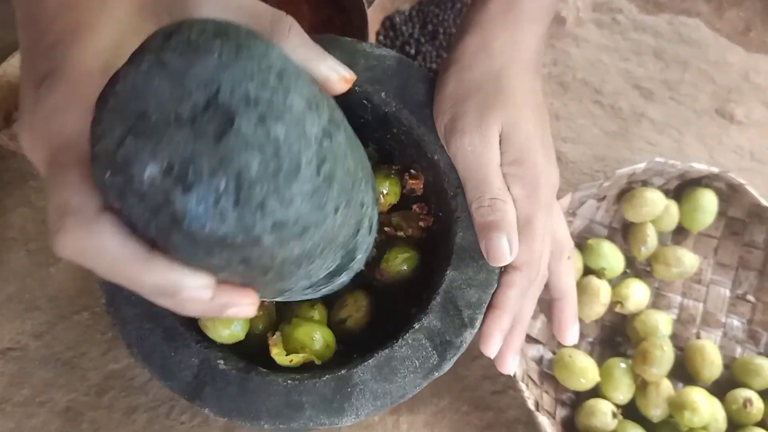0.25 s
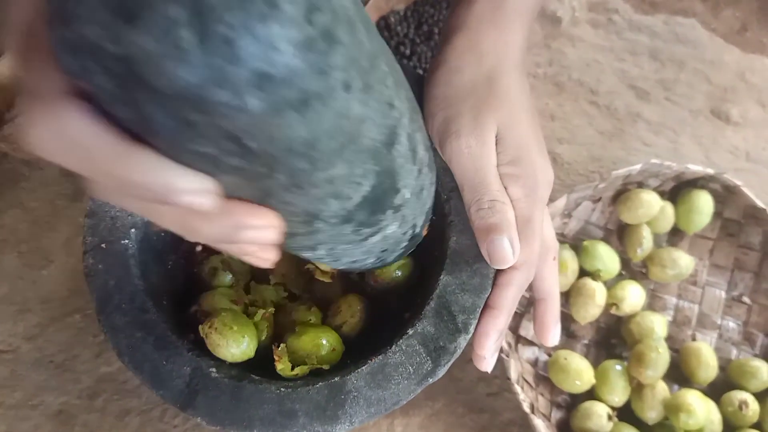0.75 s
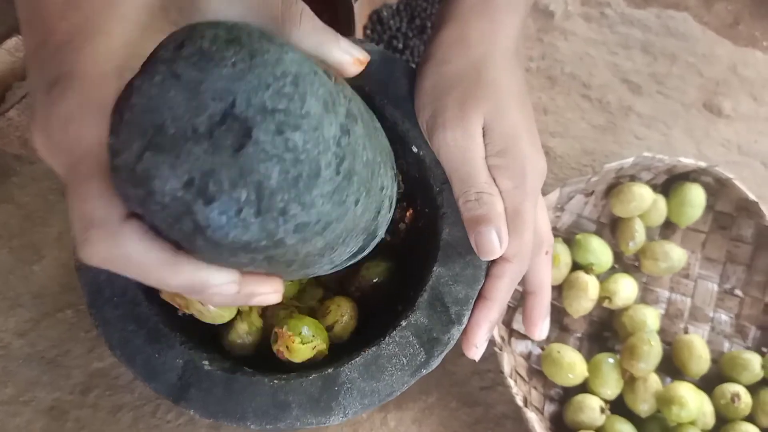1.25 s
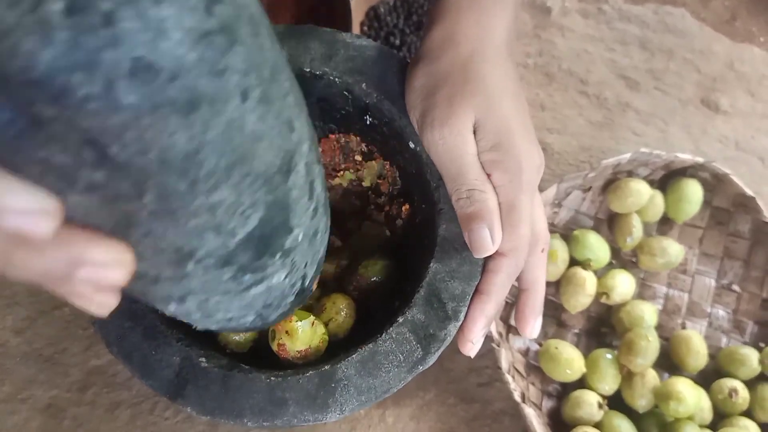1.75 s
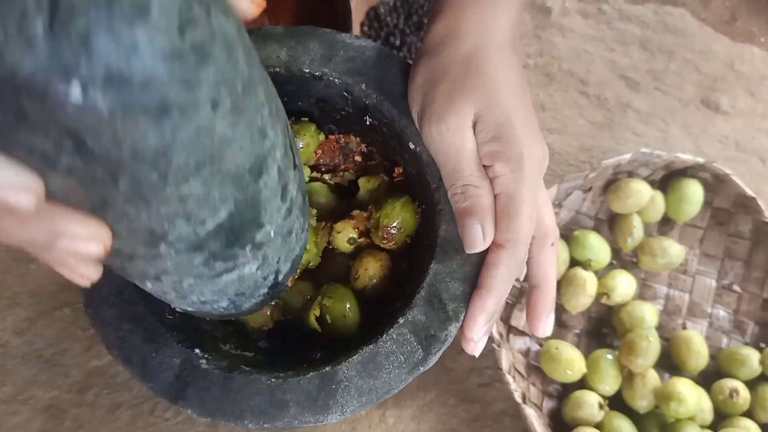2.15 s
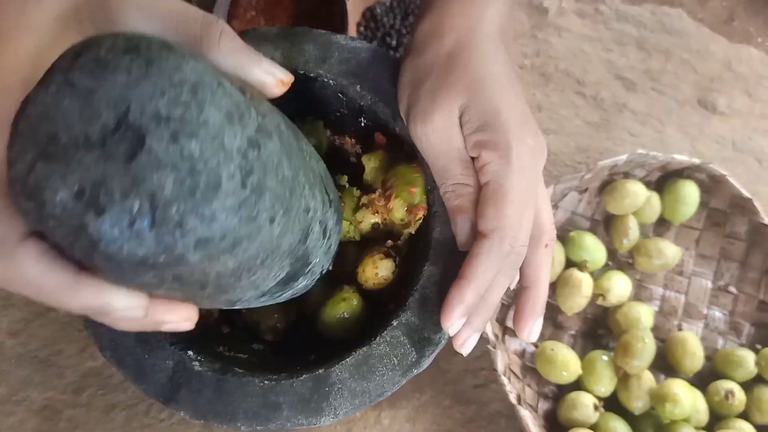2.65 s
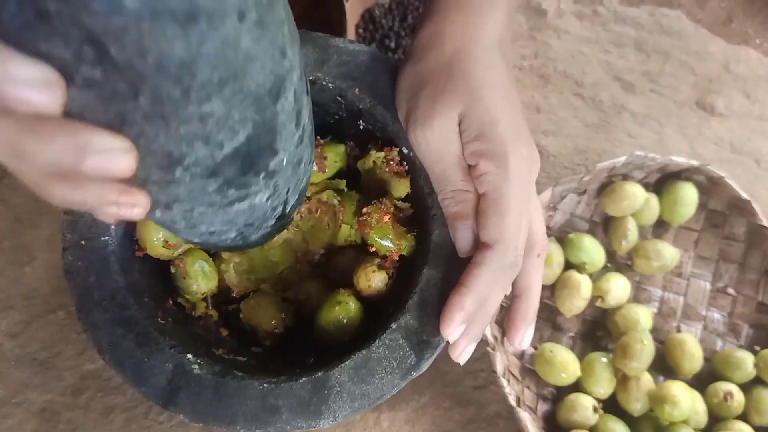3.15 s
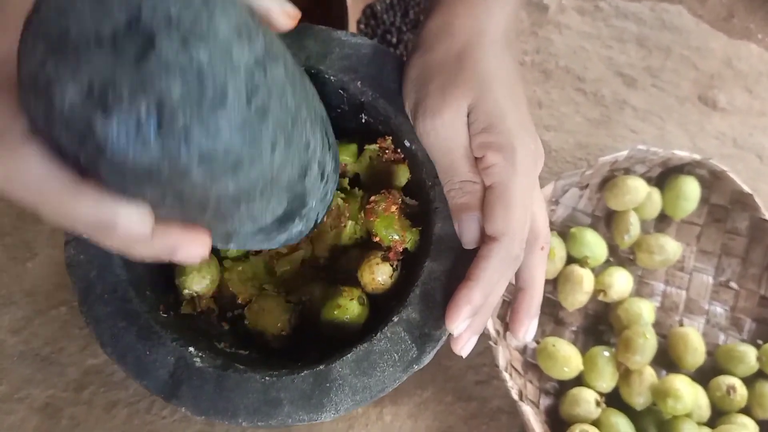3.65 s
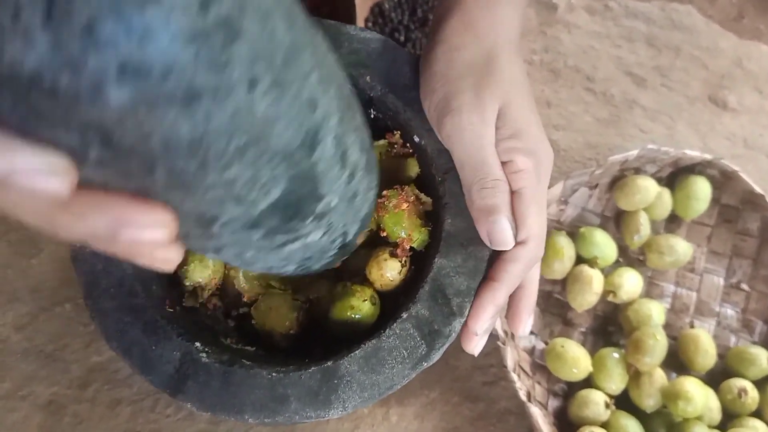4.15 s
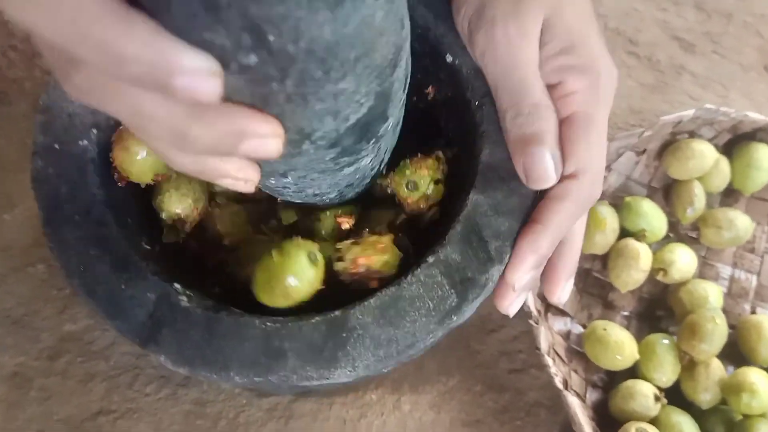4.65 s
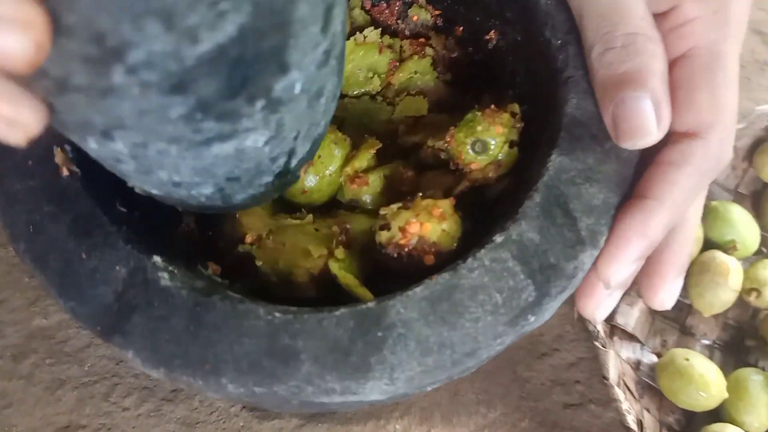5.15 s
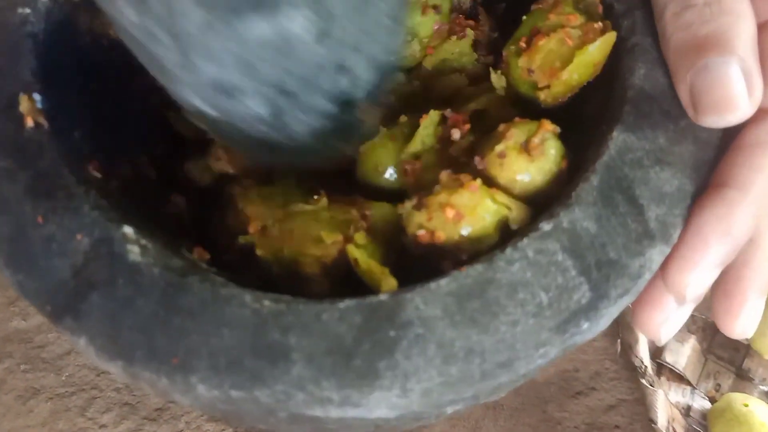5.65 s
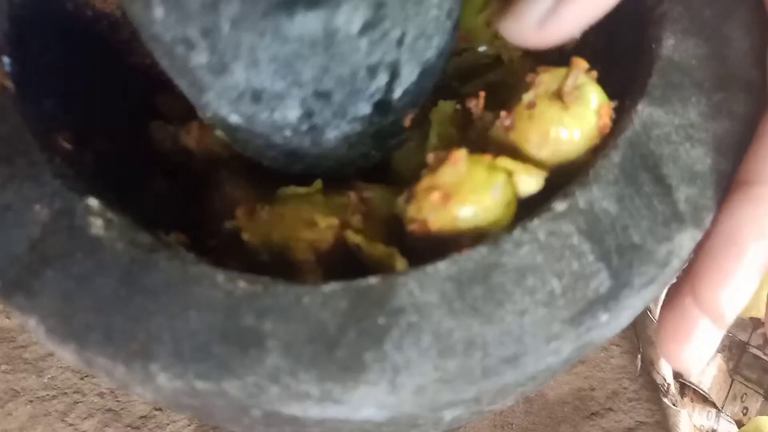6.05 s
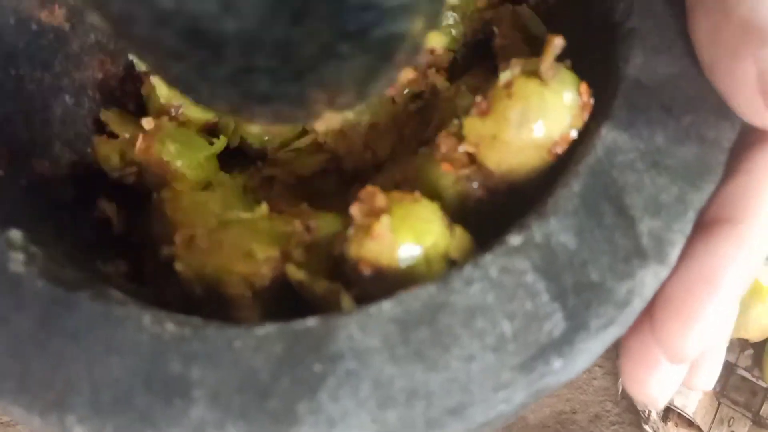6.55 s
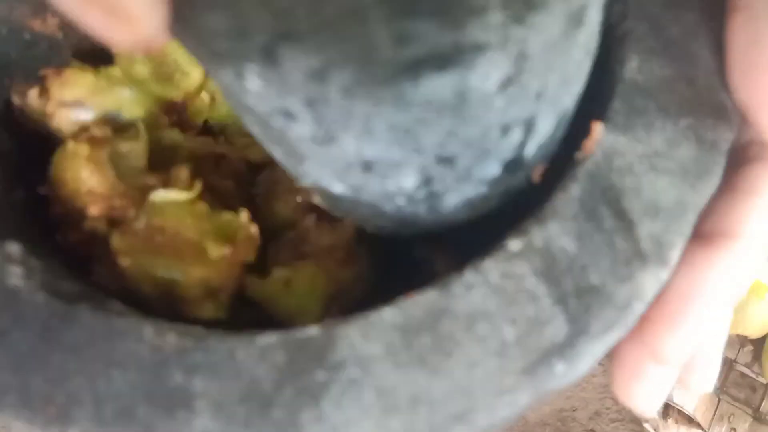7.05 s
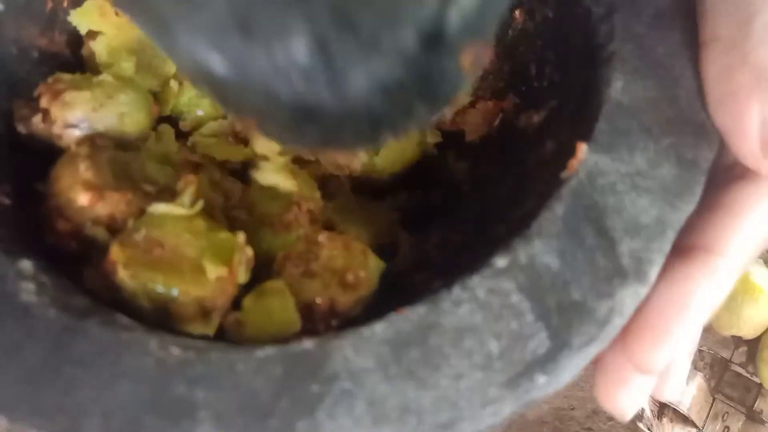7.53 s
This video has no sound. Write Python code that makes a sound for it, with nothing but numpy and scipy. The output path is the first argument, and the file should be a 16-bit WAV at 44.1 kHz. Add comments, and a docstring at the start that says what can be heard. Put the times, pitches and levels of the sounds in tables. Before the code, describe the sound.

Close up and slightly left, a stone pestle pounds olives in a heavy stone mortar about three times a second. Wet crunches and dull thuds mix with low bumps; several early strokes and one around five seconds crack sharply stone on stone. Later blows turn deeper and pulpier. Outdoors behind it, a thin high insect hiss and a distant bird's hollow three-note call continue.

```python
"""Heavy pounding, about three strokes a second: a stone pestle crushes olives in a stone mortar.
The mortar stands on the ground close to the microphones, a little to the left.
Each stroke is a swarm of wet bursts, a band-passed thud and a low boom; a few crack stone on stone in ringing modes.
Behind it insects hiss as narrow coloured noise above still air, and distant birds repeat a hollow three-note call
of nearly pure tones; the whistles of other far birds are blurred glides."""
import sys
import numpy as np
from scipy import signal
from scipy.fft import rfft, irfft, next_fast_len
from scipy.io import wavfile
from scipy.ndimage import uniform_filter1d, minimum_filter1d

SR = 44100
rng = np.random.default_rng(int(sys.argv[2]) if len(sys.argv) > 2 else 0)


def wav_out(sig):
    """Save sig, one row per channel (or a flat mono array), as 16-bit PCM at SR to the path in sys.argv[1]."""
    wavfile.write(sys.argv[1], SR, np.round(np.clip(np.atleast_2d(sig).T, -1, 1) * 32767).astype(np.int16))


N = 343539
TIME = np.arange(N) / SR

# Levels in the event tables stand before each layer's own trim; spectra are relative.
# strokes of the pestle:
# (time [s], crunch level [dB], squash time [s], thud level [dB], thud pitch [Hz], boom level [dB])
STROKES = [(-0.03, -45.5, 0.0079, -22, 380, -41.5), (0.266, -40, .014, -36.5, 214, -51),
           (0.567, -39, 0.032, -35, 238, -48.5), (0.883, -29, 0.0021, -24.5, 357, -54),
           (1.214, -41.5, 0.0034, -24, 262, -51.5), (1.552, -42, 0.021, -26.5, 409, -41.5),
           (1.969, -38, .004, -24.5, 230, -44), (2.321, -42.5, 0.026, -34, 250, -46),
           (2.648, -39, 0.01, -39, 217, -43.5), (2.972, -38.5, 0.0089, -25.5, 410, -62.5),
           (3.328, -35.5, 0.0075, -36.5, 233.4, -40), (3.649, -33.5, 0.0063, -33.5, 238, -50),
           (3.985, -35.5, 0.0084, -26.5, 280, -39), (4.355, -35.5, 0.013, -29, 334, -57),
           (4.705, -38, 0.0091, -34, 204, -38), (5.085, -31, 0.0026, -24, 186, -41.5),
           (5.430, -44, 0.035, -43.5, 188, -51.5), (5.743, -31, 0.0062, -36, 230, -39),
           (6.073, -39.5, 0.023, -36, 223, -39), (6.403, -30.5, 0.0094, -32, 142, -34.5),
           (6.707, -37, 0.026, -47, 200, -54), (6.747, -28.5, 0.0025, -31.5, 164, -33),
           (7.084, -30.5, 0.017, -43.5, 152, -54), (7.418, -31.5, 0.0092, -37, 160, -39.5),
           (7.488, -51, 0.034, -23, 520, -58), (7.723, -36, 0.01, -41.5, 210, -42.5)]
# the pestle slips off a fruit and lands again: (time of thud [s], thud level [dB])
SLIPS = [(0.290, -37), (0.608, -28), (0.66, -36.5), (0.904, -22), (1.605, -36.5), (2.37, -29.5),
         (2.684, -37.5), (3.047, -35.5), (3.376, -44.5), (3.704, -42), (4.035, -38), (4.413, -33.5),
         (4.461, -37), (5.474, -47.5), (6.793, -36), (7.123, -39.5)]
# bursting olive flesh: (frequency [Hz], density [dB per Hz])
FLESH_SPECTRUM = [(200, 2), (500, -12.5), (1000, -1.5), (1700, -5), (2900, -3.5), (4600, -10), (6400, -5.5),
                  (7300, -13), (8500, -24), (11000, -28.5), (15500, -30)]
# quick reflections close around the mortar: (frequency [Hz], density [dB per Hz])
BOWL_ECHO_SPECTRUM = [(130, -2.5), (350, -1.5), (550, 0), (900, 2), (1400, -5), (2100, -4), (2900, -1.5),
                      (4200, 3.5), (6000, -11), (10000, -15.5)]
# faint open-air tail: (frequency [Hz], density [dB per Hz])
YARD_ECHO_SPECTRUM = [(120, -11), (350, -1), (800, -4.5), (1400, -2), (1880, -4.5), (2350, 0.5), (3000, -5),
                      (4000, -7), (6000, -30.5)]
# where the mortar sits: (time [s], left over right [dB])
MORTAR_PAN = [(0, 2.5), (5.1, 3), (6.3, 2.5), (7, 3.5), (7.7, 9)]
# insect hiss: (frequency [Hz], density [dB per Hz])
INSECT_SPECTRUM = [(2820, -85.5), (4800, -54.5), (5060, -44.5), (5620, -14), (6180, -2), (6500, 0),
                   (6810, 0.5), (7310, -6), (8340, -44), (8610, -55), (9000, -57), (11700, -89),
                   (19800, -120)]
# insect chorus: (time [s], level [dB])
CHORUS_LEVEL = [(0.0, -55), (0.63, -54.5), (1.13, -57.5), (1.67, -55), (2.08, -56.5), (2.32, -55),
                (4.06, -56.5), (4.34, -58), (5.19, -61.5), (6.33, -60), (6.62, -56.5), (7.79, -57.5)]
# still air: (frequency [Hz], density [dB per Hz])
AIR_SPECTRUM = [(15, -47), (25, -20), (69, -4), (92, 3.5), (168, -14.5), (446, -20.5), (711, -22),
                (887, -8), (1160, -30), (1650, -22), (1840, -22), (1970, -26), (2630, -19.5), (4380, -27),
                (5000, -33.5), (6500, -54), (11000, -120)]
# a bird repeats its call: (time [s], level [dB])
BIRD_CALLS = [(0.081, -50.5), (0.622, -52), (1.170, -54.5), (1.783, -52.5), (2.41, -53.5), (3.038, -52),
              (3.672, -53.5), (4.358, -57.5), (5.011, -55.5), (5.708, -57), (6.406, -54.5), (7.102, -56),
              (7.742, -59)]
# notes of a call: (time from its start [s], length [s], fall in pitch [share])
CALL_NOTES = [(0, 0.059, 0.071), (0.071, 0.061, .06), (0.123, .105, 0.016)]
# whistles and coos of other far birds:
# (time [s], length [s], start pitch [Hz], end pitch [Hz], level [dB], hoarseness [share of the pitch])
WHISTLES = [(0.115, 0.092, 5630, 4930, -59, 0.12), (0.193, 0.052, 4690, 2700, -54, 0.12),
            (0.333, 0.049, 4650, 3190, -54, 0.11), (0.382, 0.087, 4970, 5830, -55.5, .1),
            (0.443, 0.036, 5130, 3400, -57, .1), (2.658, 0.27, 2464, 2147, -58, 0.26),
            (3.376, 0.262, 608, 595, -67, 0.052), (3.901, 0.45, 2678, 2632, -65, 0.0202),
            (4.078, 0.28, 630, 610, -75, .06), (4.455, .19, 2410, 2040, -68.5, 0.088),
            (4.816, .24, 2500, 2792, -72, 0.17), (5.782, .22, 1037, 1143, -63.5, 0.1),
            (6.539, .46, 2870, 2670, -68, 0.09)]
# stone meets stone: (time [s], level [dB], hardness [dB per octave])
CRACKS = [(0.8808, -2.5, 4), (1.2125, -1, 9), (1.5550, -25, -19), (1.9684, -0.5, -1.5), (2.9731, -9, -2),
          (5.084, 3.5, -2.5), (7.4921, -32, -11), (7.502, -25, -7.5), (7.5065, -24, -5),
          (7.538, -33.5, 0.5)]
# ringing modes of mortar and pestle: (frequency [Hz], level [dB], time to fall 60 dB [s])
STONE_MODES = [(190, -27, .04), (350, -20, .065), (410, -21, .05), (670, -16, .022), (797, -17, .07),
               (905, -16, .04), (1030, -14, .025), (1315, -23, .035), (1550, -15, .016), (1868, -15, .028),
               (2130, -18, .03), (2400, -22, .014), (3050, -35, .016), (3770, -38, .02), (5720, -27, .08)]
# how strongly a crack drives the modes: (frequency [Hz], drive [dB])
CONTACT_DRIVE = [(400, 1), (800, -3), (1900, 5), (5700, -6)]

FLESH_LAG_S, STONE_LAG_S = .00037, .00014   # delay of the right side
# the crunch swells with this share of the squash as time constant, at most this long
SINK_SHARE, SINK_MAX_S = 0.87, 0.0097
# the crunch is neutral at this thud level, and loses treble (dB per dB) as blows land harder
WET_THUD_DB, DULLING = -36.5, 0.96
THUD_LAG_S, BOOM_LAG_S = .004, .004   # after the height of the crunch
# a slip's thud pitch, boom and crunch relative to its thud, and squash time
SLIP_HZ, SLIP_BOOM_DB, SLIP_CRUNCH_DB, SLIP_SQUASH_S = 208, -17.5, -20, 0.0023
AIR_DB = -70
CALL_HZ, CALL_SAG_HZ_PER_S = 955.6, 1.9   # the notes start here, a little lower as the bird goes on
NOTE_ATTACK_S, NOTE_RELEASE_S, NOTE_FADE_DB_PER_S = 0.0077, 0.013, 100
# a farther bird answers every call that starts after ANSWER_FROM_S
ANSWER_FROM_S, ANSWER_LAG_S = 5.5, .454
ANSWER_HZ, ANSWER_DB = 880, -66.5   # level before the birds' trim
HARDNESS_LOW_HZ, HARDNESS_HIGH_HZ = 410, 1940   # hardness tilts the ring between these
CEILING, LIMITER_S, STOPBAND_HZ = .99, .0008, 16300   # full scale is 1


def from_db(db):
    """Decibels to gain."""
    return 10 ** (np.asarray(db) / 20)


def rms_one(x):
    """Scale to unit power."""
    return x / np.sqrt(np.mean(x ** 2) + 1e-20)


def curve(rows, t=TIME):
    """Join rows by straight lines in time, one array a column."""
    s, *columns = np.transpose(rows)
    return [np.interp(t, s, c) for c in columns]


def add(track, s, sound):
    """Mix a short sound in at a given time, cut at the ends of the track."""
    i = round(s * SR)
    sound, i = sound[max(-i, 0):], max(i, 0)
    track[i:i + len(sound)] += sound[:max(N - i, 0)]


def band(x, low_hz, high_hz):
    """Causal band-pass."""
    edges = [low_hz, min(high_hz, .45 * SR)]
    return signal.sosfilt(signal.butter(2, edges, "band", fs=SR, output="sos"), x)


def colour(x, spectrum):
    """Weight a noise with a spectrum drawn on log frequency; rms 1."""
    hz, db = np.transpose(spectrum)
    length = x.shape[-1]
    size = next_fast_len(length)
    log_hz = np.log(np.maximum(np.fft.rfftfreq(size, 1 / SR), 1))
    gain = from_db(np.interp(log_hz, np.log(hz), db, left=-90, right=-90))
    return rms_one(irfft(rfft(x, size) * gain, size)[..., :length])


def wander(rate, size):
    """Slow chance: random knots of spread 1, `rate` a second, joined by straight lines."""
    knots = np.arange(size) / SR * rate
    count = int(knots[-1]) + 2
    return np.interp(knots, np.arange(count), rng.standard_normal(count))


def wide_noise(alike, size=N):
    """Two white noises that share a part of their power."""
    alike = np.clip(alike, 0, 1)
    shared = rng.standard_normal(size)
    return np.sqrt(alike) * shared + np.sqrt(1 - alike) * rng.standard_normal((2, size))


def pan(x, left_db):
    """Tip the sound towards the left by a level difference."""
    return x * from_db(np.array([[.5], [-.5]]) * left_db)


def at_ears(x, lag_s):
    """A source left of centre: the right side hears it a little later."""
    return np.array([x, np.interp(TIME - lag_s, TIME, x)])


def blows():
    """Every landing of the pestle, in the columns of STROKES; a slip is a small stroke of its own."""
    slips = [(s - THUD_LAG_S, db + SLIP_CRUNCH_DB, SLIP_SQUASH_S, db, SLIP_HZ, db + SLIP_BOOM_DB)
             for s, db in SLIPS]
    return list(STROKES) + slips


def crunch(bursts_per_s=3000, spread_db=3.0, scatter_db=-3, clump_db=4.0, seep_db=-18, seep_s=0.042):
    """Cells burst in clumps, a swarm that swells as the pestle sinks in; the pulp crackles on as it settles."""
    sizes = from_db(spread_db * np.minimum(rng.exponential(1, N), 4)) * rng.choice([-1, 1], N)
    bursts = sizes * (rng.random(N) < bursts_per_s / SR)
    grains = at_ears(colour(bursts, FLESH_SPECTRUM), FLESH_LAG_S)
    grains = grains + from_db(scatter_db) * colour(wide_noise(0), FLESH_SPECTRUM)   # scattered inside the bowl
    grains = rms_one(grains * from_db(clump_db * wander(260, N)))
    bright = signal.sosfilt(signal.butter(1, 2700, "high", fs=SR, output="sos"), grains)
    dull_power, bright_power = np.zeros(N), np.zeros(N)
    t = np.arange(-SR // 10, SR // 3) / SR   # 0 is the height of the crunch
    after = np.maximum(t, 0)
    for s, db, squash_s, thud_db, _, _ in blows():
        bright_db = DULLING * (WET_THUD_DB - thud_db)
        swell = np.exp(np.minimum(t, 0) / min(SINK_SHARE * squash_s, SINK_MAX_S))
        squash = np.exp(-after / squash_s)
        seep = from_db(seep_db) * np.exp(-after / seep_s)
        shape = swell * np.hypot(squash, seep)
        add(dull_power, s + t[0], (shape * from_db(db - bright_db / 2)) ** 2)
        add(bright_power, s + t[0], (shape * from_db(db + bright_db / 2)) ** 2)
    return (grains - bright) * np.sqrt(dull_power) + bright * np.sqrt(bright_power)


def thuds(width=1.343, level_db=2, hollow_hz=365, hollow_db=-17, hollow_t60=0.14, shudder_db=-16, shudder_s=0.031):
    """The fruit gives way, the blow lands in two or three slow cycles, the bowl answers and the base shudders."""
    out, t = np.zeros(N), np.arange(SR // 6) / SR
    hollow = np.sin(2 * np.pi * hollow_hz * t) * from_db(hollow_db - 60 * t / hollow_t60)
    hollow *= 1 - np.exp(-t / 0.001)
    for s, _, _, db, hz, _ in blows():
        knock = band(signal.unit_impulse(len(t)), hz / width, hz * width)
        knock = band(knock, 95, 900)
        knock /= np.abs(knock).max()
        shudder = rms_one(band(rng.standard_normal(len(t)), 125, 280)) * np.exp(-t / shudder_s)
        thud = knock + hollow + from_db(shudder_db) * shudder
        add(out, s + THUD_LAG_S, from_db(db + level_db) * thud)
    return out


def booms(hz=83, build_s=0.019, level_db=10.0, scatter=.025, t60=.2):
    """The mortar's weight bounces on the ground, a low note that builds and dies."""
    out, t = np.zeros(N), np.arange(SR // 3) / SR
    for s, *_, db in blows():
        note = np.sin(2 * np.pi * hz * (1 + scatter * rng.standard_normal()) * t)
        envelope = from_db(db + level_db - 60 * t / t60) * (1 - np.exp(-t / build_s))
        add(out, s + BOOM_LAG_S, envelope * note)
    return out


def yard(x, early_db=-17, early_t60=0.081, late_db=-33, late_t60=.55):
    """Quick reflections from bowl, hands and ground, then a faint open-air tail, as decaying noise."""
    t = np.arange(SR * 3 // 4) / SR
    early = colour(wide_noise(1.0, len(t)), BOWL_ECHO_SPECTRUM)
    early = early * from_db(early_db - 60 * t / early_t60) / np.sqrt(early_t60)
    late = colour(wide_noise(0.45, len(t)), YARD_ECHO_SPECTRUM)
    late = late * from_db(late_db - 60 * t / late_t60) / np.sqrt(late_t60)
    response = (early + late) * (1 - np.exp(-t / 0.0014)) * np.sqrt(14 / SR)
    return signal.fftconvolve(x[None], response, axes=1)[:, :N]


def background(insect_db=1.5, flutter_db=2.0, air_follows=.4):
    """Many insects merge into one narrow hiss above the still air, which hushes a little when they do."""
    chorus_db, = curve(CHORUS_LEVEL)
    insects = colour(wide_noise(0.026), INSECT_SPECTRUM)
    insects = insects * from_db(chorus_db + insect_db + flutter_db * wander(60, N))
    air_db = AIR_DB + air_follows * (chorus_db - chorus_db.mean()) + 1.2 * wander(4, N)
    air = colour(wide_noise(0.8), AIR_SPECTRUM) * from_db(air_db)
    return pan(insects, left_db=4.0) + pan(air, left_db=0.74)


def call(hz, octave_db=-29, waver=.003):
    """Three nearly pure notes, each swelling quickly, then fading as its pitch falls."""
    out = np.zeros(N)
    for start_s, length_s, fall in CALL_NOTES:
        t = np.arange(int(length_s * SR)) / SR
        pitch = hz * (1 - fall * t / length_s + waver * wander(50, len(t)))
        phase = 2 * np.pi * np.cumsum(pitch) / SR
        gate = np.clip(np.minimum(t / NOTE_ATTACK_S, (length_s - t) / NOTE_RELEASE_S), 0, 1)
        envelope = np.sin(np.pi / 2 * gate) ** 2 * from_db(-NOTE_FADE_DB_PER_S * t)
        add(out, start_s, envelope * (np.sin(phase) + from_db(octave_db) * np.sin(2 * phase)))
    return out[:SR // 2]


def calling_birds(level_db=5.0, echo_s=.135, echo_db=-15, reverb_db=-15, reverb_t60=0.44):
    """One bird calls and later another answers, with an echo and a wash from the trees."""
    direct = np.zeros(N)
    for s, db in BIRD_CALLS:
        add(direct, s, from_db(db + level_db) * call(CALL_HZ - CALL_SAG_HZ_PER_S * s))
        if s > ANSWER_FROM_S:
            add(direct, s + ANSWER_LAG_S, from_db(ANSWER_DB + level_db) * call(ANSWER_HZ))
    out = direct.copy()
    add(out, echo_s, from_db(echo_db) * direct)
    size = SR // 2
    trees = wide_noise(0.25, size) * from_db(-60 * TIME[:size] / reverb_t60)
    wash = signal.fftconvolve(out[None], rms_one(trees) / np.sqrt(size), axes=1)[:, :N]
    return pan(out + from_db(reverb_db) * wash, left_db=5.0)


def whistling_birds(level_db=-3, smear_s=0.026):
    """Far glides, blurred by slow random modulation and smeared by the foliage."""
    out = np.zeros(N)
    for s, length_s, start_hz, end_hz, db, hoarse in WHISTLES:
        hz = np.linspace(start_hz, end_hz, int(length_s * SR))
        blur_hz = hoarse * hz.mean()
        blur = wander(blur_hz, len(hz)) + 1j * wander(blur_hz, len(hz))
        glide = np.real(blur * np.exp(2j * np.pi * np.cumsum(hz) / SR))
        add(out, s, from_db(db + level_db) * signal.windows.tukey(len(hz), .3) * glide)
    size = SR // 5
    leaves = rms_one(wide_noise(0.081, size) * np.exp(-TIME[:size] / smear_s)) / np.sqrt(size)
    return signal.fftconvolve(out[None], leaves, axes=1)[:, :N]


def cracks(clack_hz=900, clack_s=.0016, clack_db=-4.5, contact_s=0.00021, detune=.006,
           grit_db=-16, grit_s=.005, grit_octaves=1.9, snap_db=-13, snap_s=0.0011, snap_octaves=.6):
    """Stone stops stone in a snap and a short clack and rings the modes; a harder contact favours the high ones."""
    out, t = np.zeros(N), np.arange(SR // 4) / SR
    hz, mode_db, t60 = np.transpose(STONE_MODES)
    contact_hz, contact_db = np.transpose(CONTACT_DRIVE)
    drive_db = mode_db + np.interp(np.log(hz), np.log(contact_hz), contact_db)
    octaves = np.log2(np.clip(hz, HARDNESS_LOW_HZ, HARDNESS_HIGH_HZ) / clack_hz)
    signs = (-1) ** np.arange(len(hz))
    decay = from_db(-60 * t / t60[:, None])
    clack = np.sin(2 * np.pi * clack_hz * t) * np.sin(np.pi / 2 * np.minimum(t / clack_s, 2)) ** 2
    for s, db, hardness in CRACKS:
        gain = from_db(drive_db + hardness * octaves + 2 * rng.standard_normal(len(hz))) * signs
        pitch = hz * (1 + detune * rng.standard_normal(len(hz)))
        ring = gain @ (np.sin(2 * np.pi * pitch[:, None] * t) * decay)
        noise = rng.standard_normal(len(t))
        grit = band(noise, 2350, 3000) * np.exp(-t / grit_s) * from_db(grit_db + hardness * grit_octaves)
        snap = band(noise, 2600, 5200) * np.exp(-t / snap_s) * from_db(snap_db + hardness * snap_octaves)
        struck = (ring + grit + snap) * (1 - np.exp(-t / contact_s))
        add(out, s, from_db(db) * (struck + from_db(clack_db) * clack))
    return out


def scene():
    """The mortar stands close by, a little to the left, with insects and birds behind it."""
    near = crunch() + at_ears(cracks() + thuds(), STONE_LAG_S)
    pan_db, = curve(MORTAR_PAN)
    mortar = pan(near, pan_db) + pan(booms(), left_db=1.8) + yard(near[0])
    return mortar + calling_birds() + whistling_birds() + background()


def record(dry):
    """A fast limiter holds the hardest peaks near full scale; a steep low-pass cuts the top."""
    size = max(int(LIMITER_S * SR), 3)
    gain = CEILING / np.maximum(np.abs(dry), CEILING)
    held = dry * uniform_filter1d(minimum_filter1d(gain, size), size)
    return signal.sosfilt(signal.cheby2(14, 60, STOPBAND_HZ, fs=SR, output="sos"), held)


dry = scene()
out = record(dry)
wav_out(out)
```